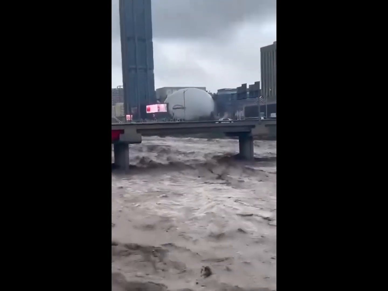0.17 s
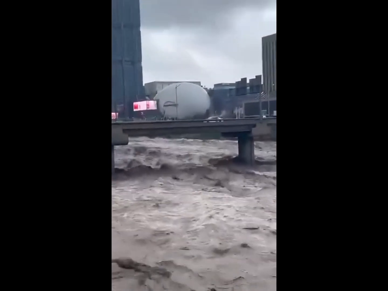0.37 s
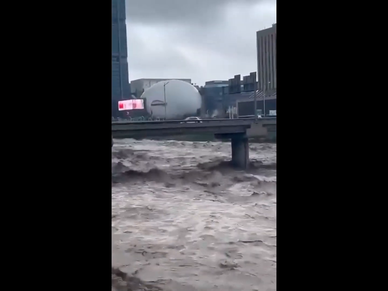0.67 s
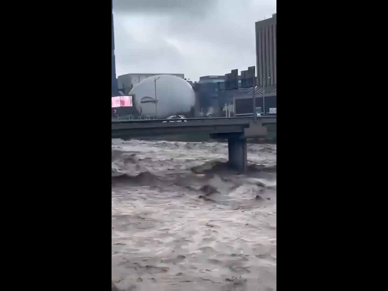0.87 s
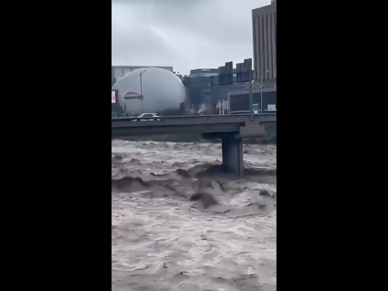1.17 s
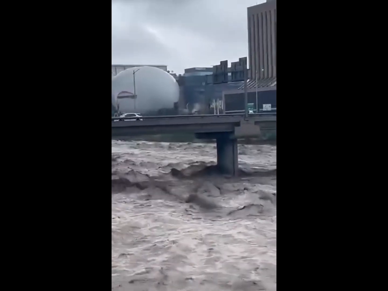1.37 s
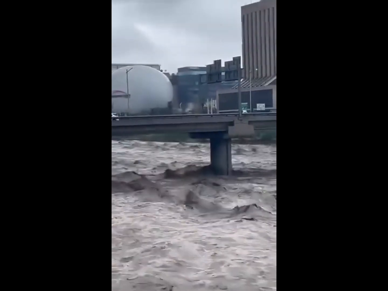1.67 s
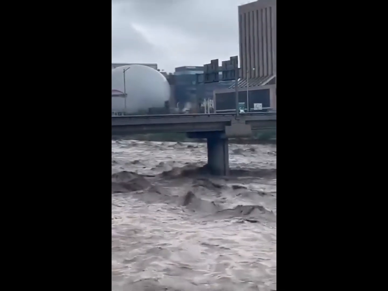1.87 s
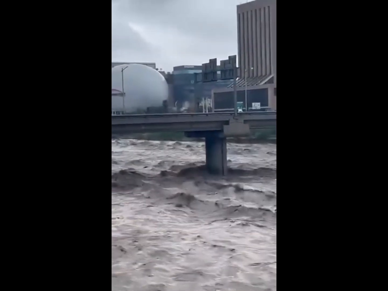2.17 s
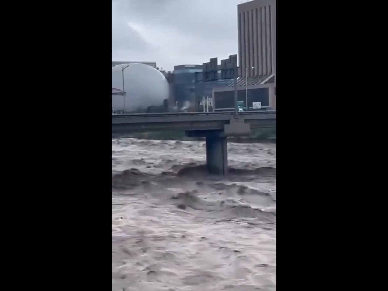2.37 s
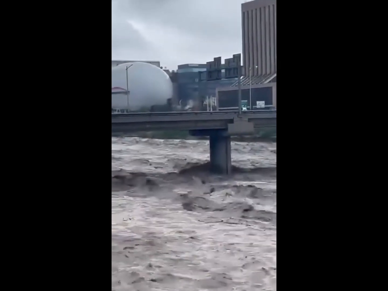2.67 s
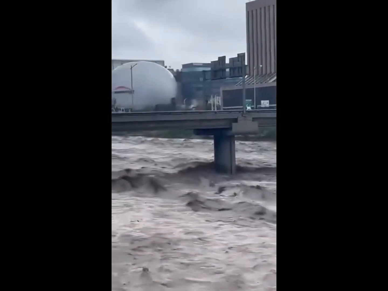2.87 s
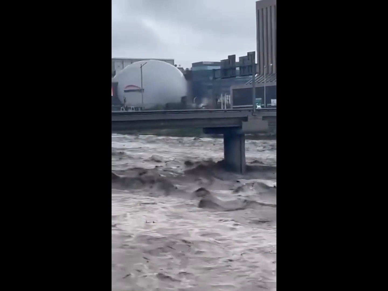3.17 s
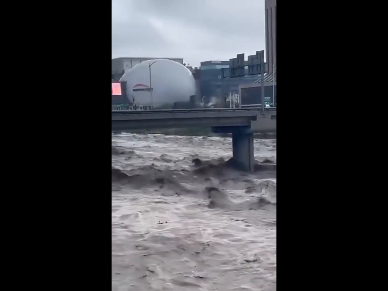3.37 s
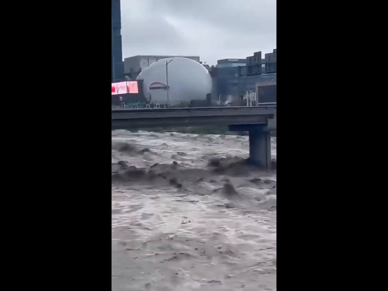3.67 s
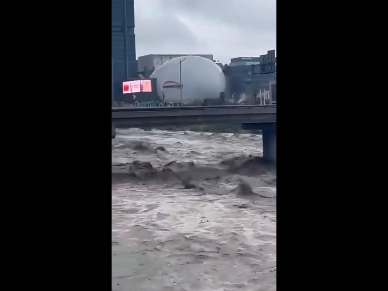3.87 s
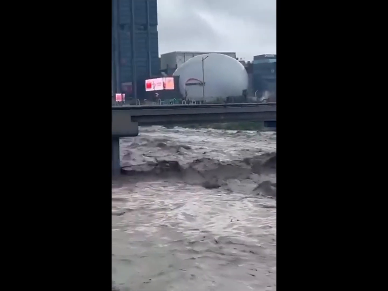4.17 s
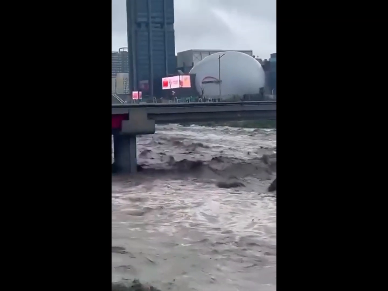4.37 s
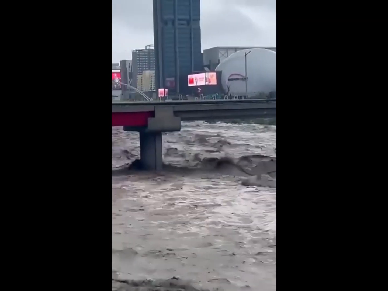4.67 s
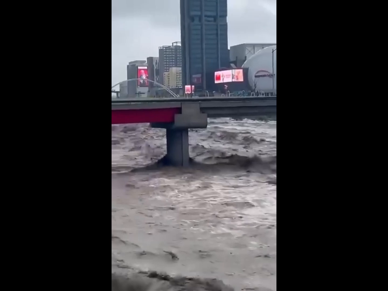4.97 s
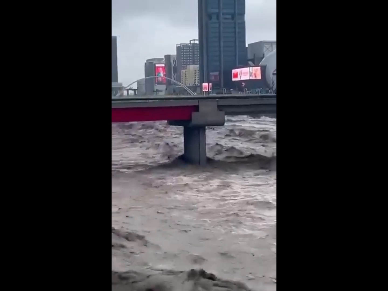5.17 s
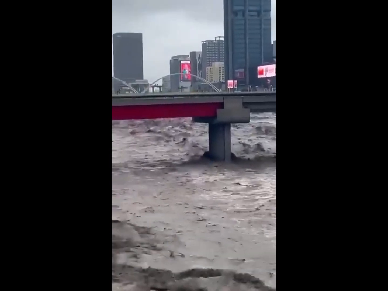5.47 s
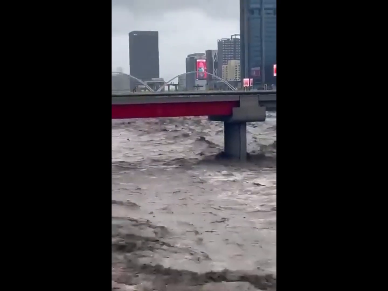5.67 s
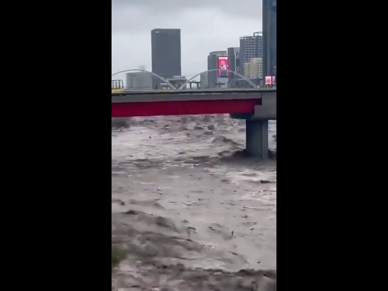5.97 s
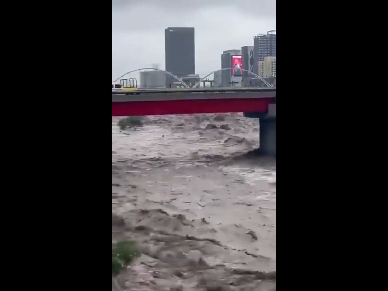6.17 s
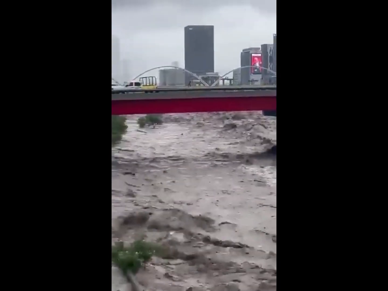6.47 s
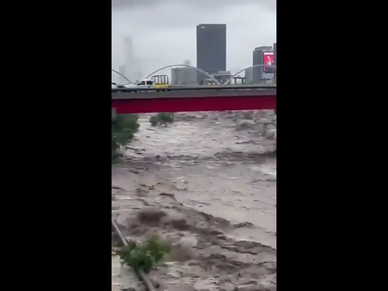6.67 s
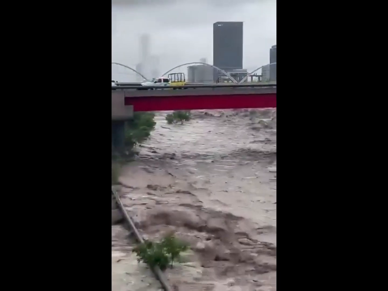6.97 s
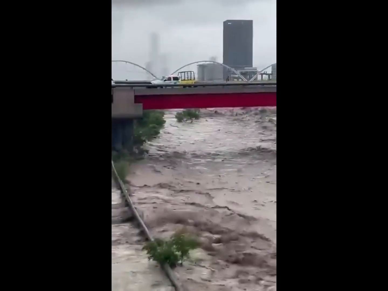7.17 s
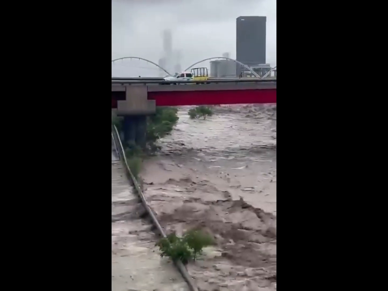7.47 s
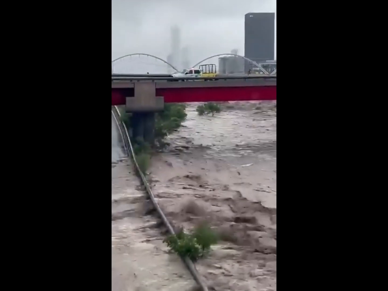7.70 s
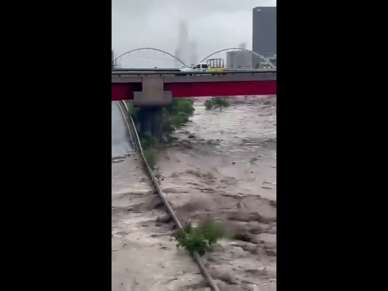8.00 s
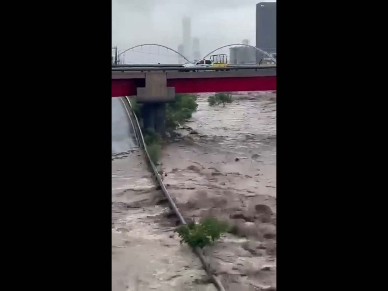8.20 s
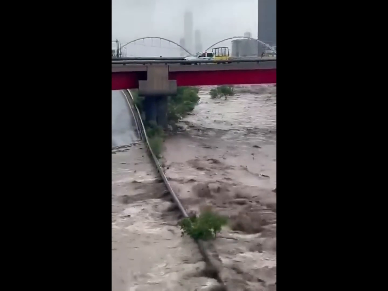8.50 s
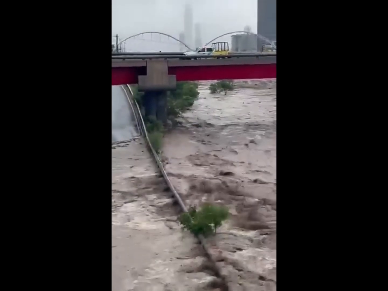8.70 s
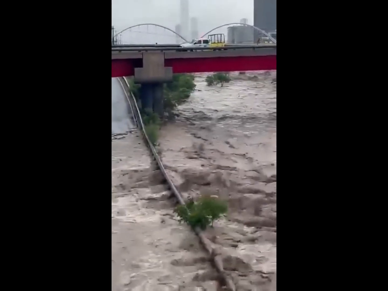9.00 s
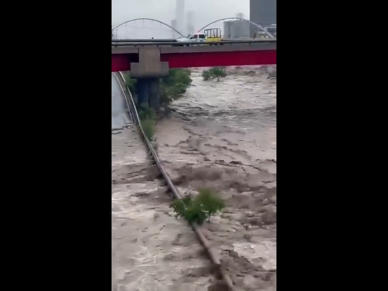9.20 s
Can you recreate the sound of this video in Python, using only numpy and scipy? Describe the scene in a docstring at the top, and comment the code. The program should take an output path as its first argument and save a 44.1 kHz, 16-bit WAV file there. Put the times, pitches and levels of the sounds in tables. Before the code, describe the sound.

Continuous wide stereo rush of floodwater, dense and low-mid heavy, with bubbly churn and shimmering hiss on top. It barely changes, spray rising slightly mid-way. Over it, close wind buffeting comes in clusters of short, dull, downward-gliding thuds and flutter, strongest at the very start, again around three and just before six seconds, softer near eight. Bare camera microphone on the bank, band-limited and slightly coloured.

```python
"""A river in flood churns past bridge pillars, heard from the bank in a storm.
Breaking waves are a broad, steady roar of patchy noise and ringing bubbles, over a low, heaving boil.
Spray is a higher fizz of finer patches and short bubbles; the camera body bends all the water's sound.
At the microphone, gusts of low noise buffet the two ports, and single eddies thump in gliding tones."""
import sys
import numpy as np
from scipy import signal
from scipy.fft import rfft, irfft, next_fast_len
from scipy.io import wavfile
from scipy.ndimage import uniform_filter1d, map_coordinates

SR = 44100
rng = np.random.default_rng(int(sys.argv[2]) if len(sys.argv) > 2 else 0)


def log_audio(samples):
    """Write samples as a 16-bit WAV file to the path given in sys.argv[1]."""
    # one column per channel
    frames = np.atleast_2d(samples).T
    # limit to full scale, then quantise
    limited = np.clip(frames, -1, 1)
    pcm = np.round(limited * 32767).astype(np.int16)
    wavfile.write(sys.argv[1], SR, pcm)


N = 411894
TOP_HZ = 12050  # the camera's band limit
SIDES = np.array([[1], [-1]]) / 2  # left and right each take half of a difference


def amp(db):
    """Decibels to gain."""
    return 10 ** (np.asarray(db) / 20)


def unit(x):
    """x at rms 1."""
    return x / np.sqrt(np.mean(x ** 2) + 1e-20)


def along(points, hz):
    """(hz, value) points read on a log frequency axis."""
    point_hz, value = np.transpose(points)
    return np.interp(np.log(hz + 1), np.log(point_hz + 1), value)


def curves(rows):
    """One value per sample for each column after the time."""
    time_s, *columns = np.transpose(rows)
    return [np.interp(np.arange(N) / SR, time_s, column) for column in columns]


def wobble(rate):
    """A smooth random curve, rate knots a second."""
    knots = rng.standard_normal(int(N * rate / SR) + 4)
    return map_coordinates(knots, [np.arange(N) * rate / SR])


def filtered(x, response):
    """x times a complex response of frequency."""
    m = next_fast_len(N + SR // 2)
    return irfft(rfft(x, m) * response(np.fft.rfftfreq(m, 1 / SR)), m)[..., :N]


def turbulence(spectrum, evenness):
    """Low wind noise whose chance swells are partly evened out, so that the gusts shape it."""
    noise = unit(filtered(rng.standard_normal(N), lambda hz: amp(along(spectrum, hz))))
    power = np.abs(uniform_filter1d(noise ** 2, size=SR // 14)) + 1e-6
    return unit(noise / power ** (np.clip(evenness, 0, 1) / 2))


def gust_shape(crest_s, rise_s, fall_s, tail=1.4):
    """A gust swells to its crest like a bell curve and dies away with a longer tail."""
    t = np.arange(N) / SR - crest_s
    return np.exp(-np.where(t < 0, (t / rise_s) ** 2, np.abs(t / fall_s) ** tail))


# colour of the deep push of wind on both ports: hz, relative_level_db
BUFFET_COLOUR = [(15, -42), (28, -18), (42, -3.5), (62, 4), (90, 2.5), (130, -2.5), (200, -8.5), (320, -53),
                 (700, -72), (2000, -100)]
# colour of the higher flutter at both ports: hz, relative_level_db
FLUTTER_COLOUR = [(40, -14), (90, -4.5), (145, 5), (220, -0.5), (300, -6), (370, -8), (440, -20.5),
                  (1000, -20.5), (3000, -59)]
# colour of the crosswind at the ports: hz, relative_level_db
CROSSWIND_COLOUR = [(20, -16), (60, -6), (100, -6), (145, 0.5), (240, -4.5), (360, -6.5), (550, -13),
                    (1000, -23), (2500, -45)]
# the breeze between the gusts, before random swells: time_s, buffet_db, crosswind_db
BREEZE_LEVELS = [(0, -37.5, -29), (0.8, -42, -48), (1.15, -41, -62), (1.55, -38.5, -44), (1.95, -35.5, -55),
                 (2.3, -45, -32), (2.7, -32, -39.5), (3.55, -29.5, -39), (3.8, -29.5, -68),
                 (4.65, -29.5, -49), (5.3, -30.5, -67), (6.45, -35, -43), (7.2, -38.5, -69),
                 (7.6, -33, -35), (8.25, -30.5, -83), (9.34, -31.5, -47)]
# gusts, before flicker: crest_s, buffet_db, flutter_db, crosswind_db, rise_s, fall_s
GUST_LIST = [(0.03, -19, -22, -23, 0.044, 0.082), (0.24, -27, -37, -42, 0.04, 0.056),
             (0.55, -29, -27, -33, 0.066, 0.062), (0.66, -28.5, -32, -43, 0.076, 0.26),
             (2.89, -30, -27.5, -35, 0.094, 0.088), (3.11, -29, -35, -31, 0.045, 0.065),
             (3.33, -24, -30, -38, 0.11, 0.11), (5.59, -25, -29, -30, 0.091, 0.12),
             (5.77, -22, -32, -26.5, 0.1, 0.25), (6.08, -26, -31.5, -31, 0.059, 0.12),
             (7.8, -28, -29, -31, 0.12, 0.13), (8.11, -26.5, -36.5, -40, 0.098, 0.14)]
FLUTTER_DB, FLUTTER_GROWS = -35, 0.55  # flutter in an average breeze; its dB per dB of breeze
SURGE_DB, FLICKER_DB = 1.3, 1.7  # scale of the wind's random slow surges and quick flicker


def wind():
    """Breeze and gusts press buffet and flutter on both ports; crosswind pushes one and pulls the other."""
    breeze_db, cross_db = curves(BREEZE_LEVELS)
    gusts = 0
    for crest_s, *levels_db, rise_s, fall_s in GUST_LIST:
        gusts = gusts + amp(levels_db)[:, None] * gust_shape(crest_s, rise_s, fall_s)
    gust_buffet, gust_flutter, gust_cross = gusts

    breeze_buffet = amp(breeze_db + SURGE_DB * wobble(14))
    breeze_change_db = breeze_db - breeze_db.mean()
    breeze_flutter = amp(FLUTTER_DB + FLUTTER_GROWS * breeze_change_db + SURGE_DB * wobble(12))
    breeze_cross = amp(cross_db + SURGE_DB * wobble(8))

    # breeze and gust add as powers
    buffet = np.hypot(breeze_buffet, gust_buffet) * turbulence(BUFFET_COLOUR, evenness=0.8)
    flutter_level = np.hypot(breeze_flutter, gust_flutter) * amp(FLICKER_DB * wobble(35))
    flutter = flutter_level * turbulence(FLUTTER_COLOUR, evenness=0.3)
    cross_level = np.hypot(breeze_cross, gust_cross) * amp(FLICKER_DB * wobble(25))
    crosswind = cross_level * turbulence(CROSSWIND_COLOUR, evenness=0.39)
    return buffet + flutter + np.array([crosswind, -crosswind])


# eddies that strike the ports; the slap is relative to the push, the pitch glides towards last_hz:
# start_s, push_peak_db, first_hz, last_hz, length_s, slap_db, left_minus_right_db
EDDY_LIST = [(0.003, -10, 74.5, 65, 0.018, -23, 4), (0.027, -3, 125, 89.5, 0.012, -21, -1),
             (0.043, -16, 150, 130, 0.017, -12, 0), (0.076, -22, 150, 130, 0.037, -22, 0),
             (0.119, -13, 230, 160, 0.0064, -15, 0), (0.192, -19, 300, 150, 0.0053, -3, 0),
             (0.509, -23, 220, 140, 0.009, -10, 0), (0.53, -10.5, 560, 45, 0.024, -7, 1),
             (0.587, -20, 160, 110, 0.01, -14, 0), (0.617, -14.5, 292, 150, 0.024, -18, -2),
             (0.644, -15, 293, 252, 0.02, -20, -4), (0.702, -20, 260, 110, 0.019, -20, 3),
             (1.853, -15, 330, 190, 0.0033, -17, 4), (2.912, -19, 125, 100, 0.015, -18, -1),
             (2.944, -9.5, 166, 99, 0.017, -8, 2.5), (3.073, -18.5, 200, 115, 0.025, -18, 0),
             (3.104, -15.5, 110, 75, 0.014, -11, 2), (3.164, -26, 390, 347, 0.021, -20, 8),
             (3.214, -13, 85, 75, 0.017, -14, 1), (3.27, -12, 131, 67.6, 0.027, -15, 2),
             (3.299, -18, 75, 62, 0.02, -18, 0), (3.347, -14, 100, 64.7, 0.019, -10, 0),
             (3.386, -13.5, 69.6, 59.7, 0.024, -9, 0.5), (5.505, -16, 175, 130, 0.012, -18, 0),
             (5.553, -6.5, 160, 75, 0.016, -20, 0.5), (5.614, -14, 125, 91, 0.011, -6, 5),
             (5.693, -18, 218, 130, 0.021, -13, 5), (5.711, -15, 150, 72, 0.044, -10, 2.5),
             (5.757, -15, 150, 116, 0.018, -12, 5), (5.812, -11.5, 78, 58, 0.036, -16, 2),
             (5.862, -14.5, 75, 62, 0.016, -18, 0), (6.022, -12.5, 131, 96, 0.015, -7, 1),
             (6.08, -14, 75, 56, 0.018, -11, 2), (6.191, -9.5, 135, 55, 0.024, -1, 2),
             (7.715, -18, 170, 130, 0.018, -18, 2), (7.77, -13, 140, 115, 0.0072, -21, 4),
             (7.798, -14, 100, 100, 0.041, -18, 1.5), (8.003, -15.5, 115, 68, 0.017, -12, 1),
             (8.068, -19, 110, 70, 0.016, -14, 1)]


def eddies(attack_s=0.0027, glide=0.363, fade=2.7, slap_hz=285, slap_cycles=0.68):
    """Each eddy pushes and pulls at the ports at a rate that glides down as it passes, and slaps them as its
    first turn ends."""
    out = np.zeros((2, N + SR))
    t = np.arange(SR // 10) / SR
    for start_s, push_db, first_hz, last_hz, length_s, slap_db, lean_db in EDDY_LIST:
        pitch_hz = last_hz * (first_hz / last_hz) ** np.exp(-t / (glide * length_s))
        turns = np.cumsum(pitch_hz) / SR
        envelope = (1 - np.exp(-t / attack_s)) * np.exp(-(t / length_s) ** fade)
        push = envelope * np.sin(2 * np.pi * turns)
        # the passing core knocks the port, which rings very briefly around the end of the first turn
        slap_turns = slap_hz * (t - np.interp(1, turns, t))
        slap = np.sin(2 * np.pi * slap_turns) * np.exp(-(slap_turns / slap_cycles) ** 2)
        thump = push / np.max(np.abs(push)) + amp(slap_db) * slap
        first = round(start_s * SR)
        out[:, first:first + len(t)] += amp(push_db + lean_db * SIDES) * thump
    return out[:, :N]


def patchy_noise(depth_db, size):
    """Two unrelated noises that swell together in patches, size frames long and some hundred Hz wide."""
    frames = signal.stft(rng.standard_normal((2, N)), nperseg=512)[2]
    field = rng.standard_normal(frames.shape[1:])
    field = uniform_filter1d(field, size=7, axis=0)  # across frequency
    field = uniform_filter1d(field, size=size, axis=1)  # along time
    patches = frames * amp(depth_db * unit(field))
    return unit(signal.istft(patches, nperseg=512)[1][:, :N])


def bubbles(count, centre_hz, spread, cycles, size_db):
    """Two streams of bubbles, pitched within spread octaves: each rings and dies as its pitch rises."""
    start, pitch, size, angle = rng.random((count, 4)).T
    hz = np.minimum(centre_hz * 2 ** (spread * (2 * pitch - 1)), TOP_HZ)[:, None]
    t = np.arange(SR // 50) / SR
    age = t * hz / cycles
    phase = 2 * np.pi * hz * t * (1 + np.minimum(age, 1) / 10)
    ring = np.sin(phase) * np.exp(-2 * age) * (1 - t / t[-1])
    ring = ring * amp(-size_db * np.log(np.maximum(size, .004)))[:, None]  # a few are much louder
    where = ((start * N).astype(int)[:, None] + np.arange(len(t))).ravel()
    streams = []
    for share in (np.cos(2 * np.pi * angle), np.sin(2 * np.pi * angle)):
        streams.append(np.bincount(where, (ring * share[:, None]).ravel(), N)[:N])
    return unit(np.array(streams))


# how alike the water sounds at the two ports: hz, coherence
WATER_COHERENCE = [(80, 0.9), (200, 0.92), (330, 0.95), (470, 0.6), (700, 0.76), (1250, 0.56), (1550, .66),
                   (1720, 1), (1930, 1), (2200, 0.61), (3400, 0.54), (4050, 0.77), (4400, 0.5),
                   (5200, 0.38), (5650, 0.72), (6100, 0.75), (6450, 0.88), (6900, 0.6), (7400, 1),
                   (7850, 1), (8050, 0.53), (9050, 0.54), (9400, 1), (9800, 0.5), (10800, 0.48),
                   (11500, 0.85), (12000, 0.6)]


def at_ports(pair, spectrum):
    """Colour two unrelated signals and mix them to a left and right of the water's coherence."""
    def mid_and_side(hz):
        turn = np.arccos(np.clip(along(WATER_COHERENCE, hz), 0, .995)) / 2
        return amp(along(spectrum, hz)) * np.array([np.cos(turn), np.sin(turn)])

    mid, side = filtered(pair, mid_and_side)
    return unit(np.array([mid + side, mid - side]))


# the low boil, before its random heave: time_s, level_db
BOIL_LEVELS = [(0, -41), (1.0, -52.5), (1.45, -29.5), (2.1, -43), (3.0, -46), (3.8, -36), (4.8, -45),
               (5.7, -39), (6.5, -36.5), (7.2, -33), (8.1, -46.5), (9.34, -36)]
# colour of the boil: hz, relative_level_db
BOIL_COLOUR = [(60, -35), (150, -6), (215, -1), (290, -1.5), (370, -8), (480, -21), (1000, -53),
               (3000, -80)]


def standing_waves():
    """The big waves behind the pillars collapse into a low, slowly heaving boil."""
    boil_db, = curves(BOIL_LEVELS)
    noise = rng.standard_normal((2, N))
    return amp(boil_db + 0.48 * wobble(5.7)) * at_ports(noise, BOIL_COLOUR)


# the spray swells and fades a little as the camera pans across the river: time_s, level_db
SPRAY_LEVELS = [(0, -39), (3.2, -37), (5, -36.5), (6.1, -36), (7, -38), (9.34, -39.5)]
# filter that colours the spray: hz, gain_db
SPRAY_COLOUR = [(500, -47), (1600, -0.5), (3000, 3), (4200, 0.5), (5050, 2), (5300, -0.5), (6100, -6),
                (7700, -3.5), (8100, -6), (9500, -7.5), (10850, -7.5), (11150, -13), (12000, -15)]


def spray():
    """Spray is a fine, quickly shimmering fizz of patchy noise and short-lived bubbles."""
    spray_db, = curves(SPRAY_LEVELS)
    drops = bubbles(count=4000, centre_hz=5340, spread=1.36, cycles=3.2, size_db=1.0)
    fizz = patchy_noise(depth_db=1.7, size=9) + amp(-15.0) * drops
    return amp(spray_db + 0.28 * wobble(8)) * at_ports(fizz, SPRAY_COLOUR)


# filter that colours the roar: hz, gain_db
ROAR_COLOUR = [(25, -43), (70, -36), (130, -17), (215, -0.5), (300, -1.5), (420, -2), (600, -4.5),
               (880, -8.5), (1250, -10.5), (1600, -12.5), (2400, -17), (4000, -24.5), (8000, -52),
               (12000, -61)]


def breaking_waves(level_db=-29):
    """Waves break into a steady roar of patchy noise, with longer-ringing bubbles in it."""
    air = bubbles(count=4500, centre_hz=1451, spread=1.0, cycles=20.8, size_db=1.5)
    churn = patchy_noise(depth_db=0.8, size=16) + amp(-14.5) * air
    return amp(level_db + 0.57 * wobble(4.6)) * at_ports(churn, ROAR_COLOUR)


# phase difference of the water between the ports: hz, left_lead_radians
PORT_LEAD = [(0, 0), (430, -1.0), (690, -0.7), (950, -1.3), (1720, -0.1), (1980, 0.2), (2580, 2.6),
             (3790, 0.1), (4130, 0.2), (4480, 1.2), (4910, 0.7), (5430, 3.1), (6830, 3.2), (6950, 6.1),
             (7840, 6.3), (8100, 5.6), (8530, 5.4), (9040, 5.7), (9300, 6.3), (9560, 6.4), (10200, 8.9),
             (10700, 7.8), (11100, 6.5), (11500, 6.3)]
# level difference of the water between the ports: hz, left_minus_right_db
PORT_SHADE = [(80, 13), (290, -0.5), (370, 2), (580, -3.5), (800, 1.5), (1150, -3), (1450, 0), (12000, 0)]


def river():
    """The camera body bends the roar, boil and spray in level and phase on the way to each port."""
    def ports(hz):
        lead = np.interp(hz, *np.transpose(PORT_LEAD))
        return amp(SIDES * along(PORT_SHADE, hz)) * np.exp(1j * SIDES * lead)

    return filtered(breaking_waves() + standing_waves() + spray(), ports)


def scene():
    """The river ahead, the wind at the microphone."""
    return river() + wind() + eddies()


def record(dry):
    """The camera sheds the deepest rumble and keeps nothing above its band limit."""
    low_cut = signal.butter(2, 24, "highpass", fs=SR, output="sos")
    return filtered(signal.sosfilt(low_cut, dry), lambda hz: hz < TOP_HZ)


dry = scene()
out = record(dry)
log_audio(out)
```